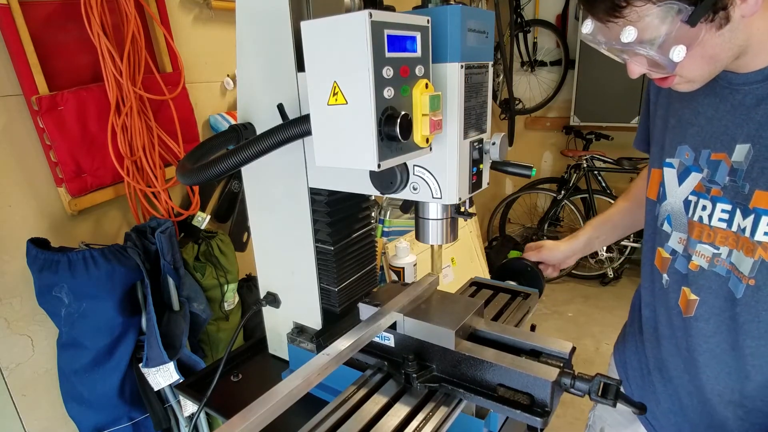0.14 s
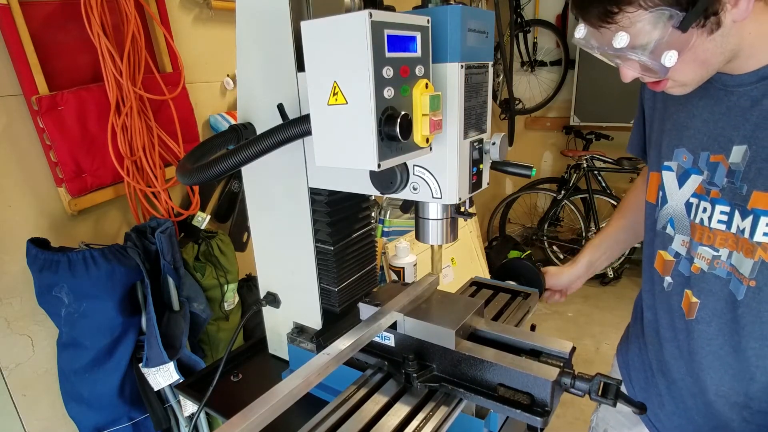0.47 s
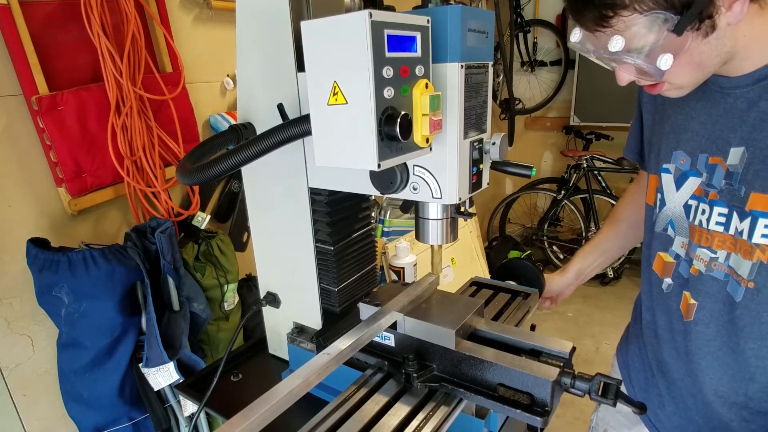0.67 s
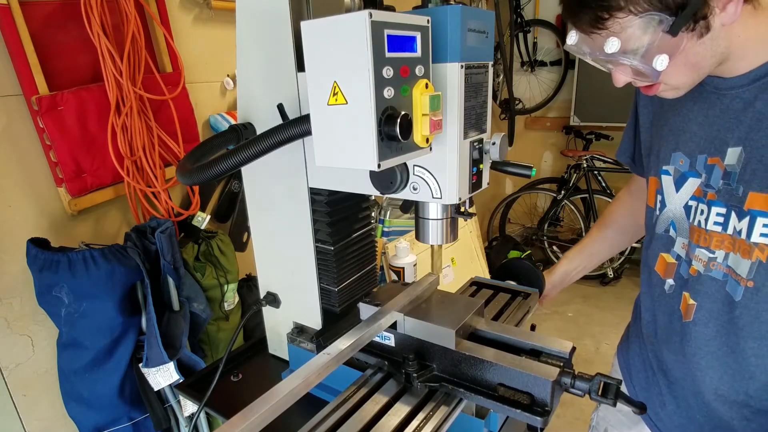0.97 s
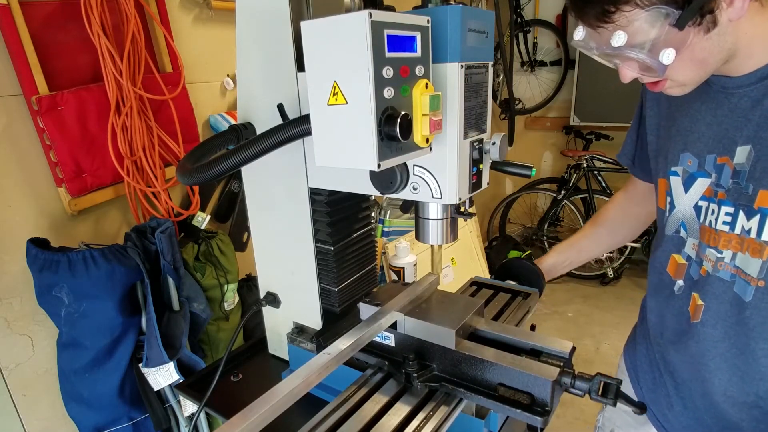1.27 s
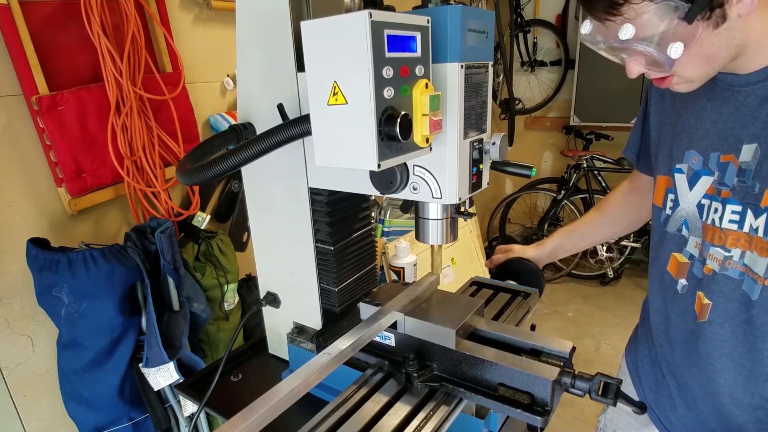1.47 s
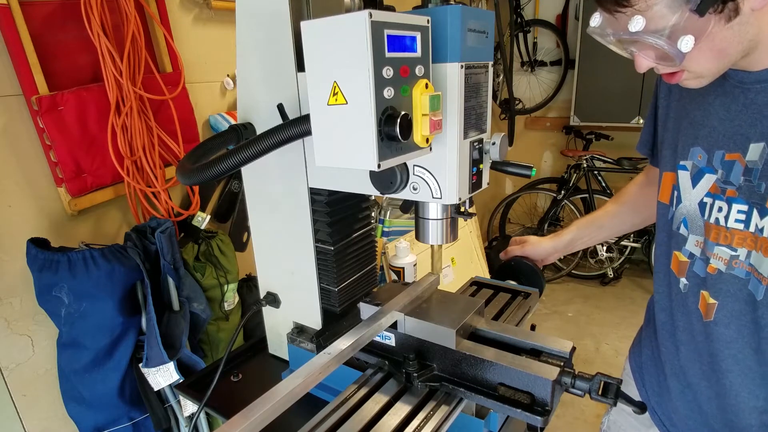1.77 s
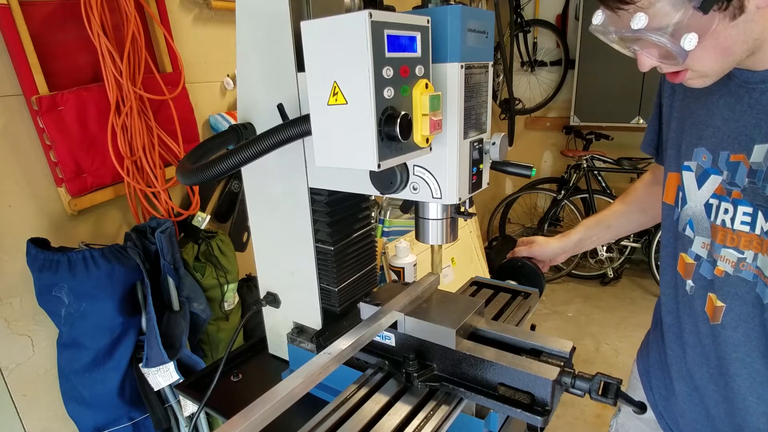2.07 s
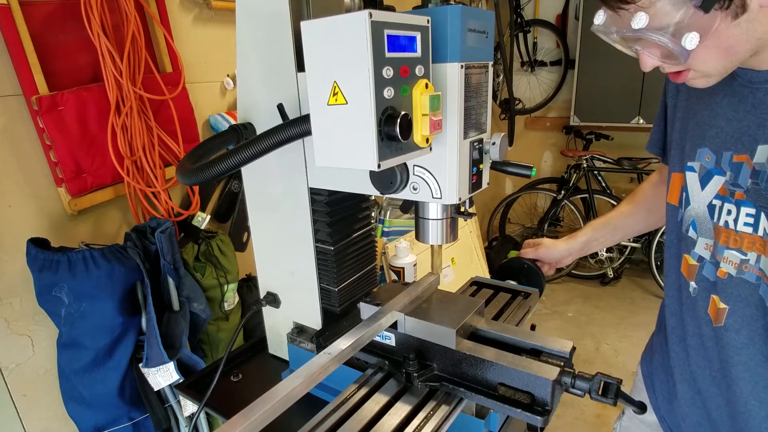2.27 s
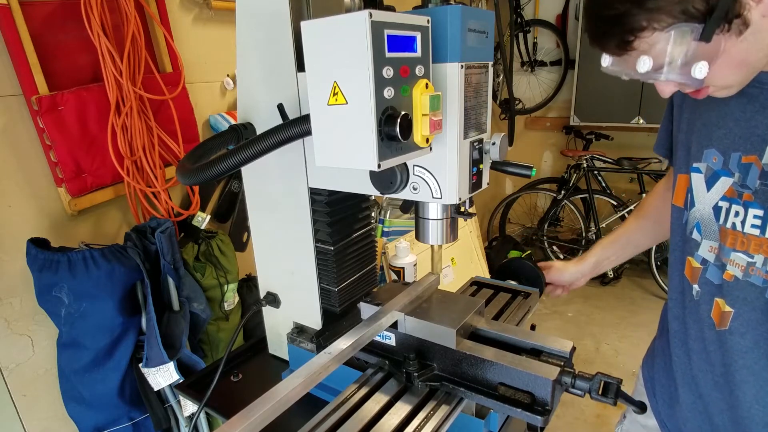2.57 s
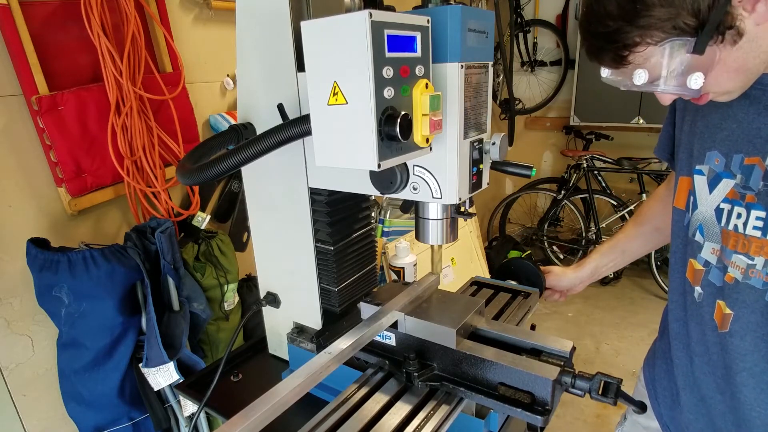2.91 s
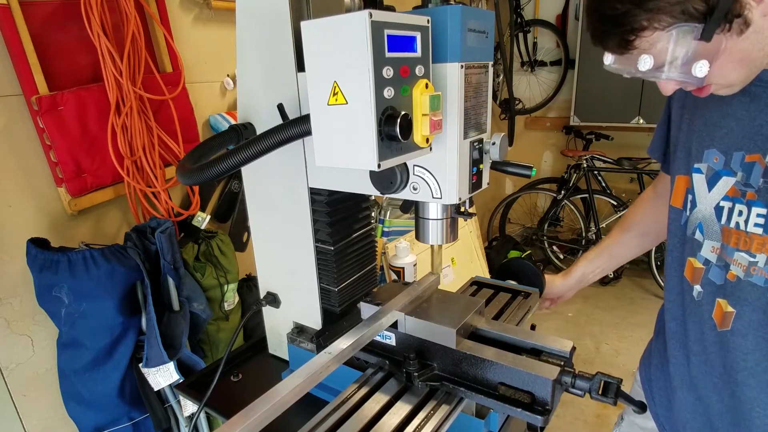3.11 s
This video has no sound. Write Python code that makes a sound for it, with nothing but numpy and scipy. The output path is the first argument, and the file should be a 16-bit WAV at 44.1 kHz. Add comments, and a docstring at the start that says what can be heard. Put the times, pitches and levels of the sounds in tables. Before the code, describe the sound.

A milling machine whines and rattles steadily while its cutter hisses lightly through a metal bar.

```python
"""Bench mill cutting aluminium

A bench mill runs in a small garage: its motor pinion whines against the spindle gear, teeth rattle and bearings sing.
An end mill bites lightly into a bar: flutes thump the table at multiples of spindle speed and scrape off chips
with a high, ringing hiss of coloured noise and fuzzy tones. The speed wavers a little as the hand feed varies;
gears, bearings and cutter follow it. The motor drive adds a thin whistle of fixed pitch."""
import sys
import numpy as np
from scipy.fft import rfft, irfft, next_fast_len
from scipy.io import wavfile
from scipy.ndimage import map_coordinates

SR = 44100
rng = np.random.default_rng(int(sys.argv[2]) if len(sys.argv) > 2 else 0)


def unload_wav(signal):
    """Save mono or channel-first audio to the path in sys.argv[1] as 16-bit WAV at rate SR, clipped to [-1, 1]."""
    wavfile.write(
        sys.argv[1],
        SR,
        np.round(np.clip(np.atleast_2d(signal).T, -1, 1) * 32767).astype(np.int16),
    )


N = 143325
TIME_S = np.arange(N) / SR


def amp(db):
    """Decibels to gain."""
    return 10 ** (np.asarray(db) / 20)


def unit(x):
    """Scale to rms 1."""
    return x / np.sqrt(np.mean(x ** 2) + 1e-20)


def along(points, hz):
    """Interpolate (Hz, value) points on a log frequency axis."""
    point_hz, value = np.transpose(points)
    return np.interp(np.log(hz + 1), np.log(point_hz + 1), value)


def curve(rows, column=1):
    """One column of (seconds, value, ..) rows, interpolated to every sample."""
    columns = np.transpose(rows)
    return np.interp(TIME_S, columns[0], columns[column])


def wobble(knots_per_s):
    """A smooth random curve through normal-distributed knots."""
    knots = rng.standard_normal(N // 20)
    return map_coordinates(knots, [np.arange(N) * knots_per_s / SR + 2], mode="wrap")


def cycle(turns):
    """A cosine, one period per turn."""
    return np.cos(2 * np.pi * turns)


def filtered(x, response):
    """Apply a gain that depends on frequency, zero-padded."""
    m = next_fast_len(N + SR // 2)
    return irfft(rfft(x, m) * response(np.fft.rfftfreq(m, 1 / SR)), m)[..., :N]


# Left-right likeness of diffuse sound. Each row: frequency in Hz, correlation from -1 to 1.
LIKENESS = [(60, 0.69), (270, 0.97), (450, 0.82), (740, 0.46), (1200, 0.14), (2000, 0.25), (3300, 0.098),
            (5500, -0.25), (15000, -0.082)]
RIPPLE_DB, RIPPLE_STEP_HZ = 1, 29.88  # fine colour from the garage's reflections


def diffuse(pair, spectrum, pan_db=0):
    """Colour two white noises and spread them in stereo as the garage walls do."""
    def response(hz):
        angle = np.arccos(np.clip(along(LIKENESS, hz), -1, 1)) / 2
        ripple_db = RIPPLE_DB * map_coordinates(rng.standard_normal(N // 20), [hz / RIPPLE_STEP_HZ])
        return amp(along(spectrum, hz) + ripple_db) * [np.cos(angle), np.sin(angle)]

    mid, side = filtered(pair, response)
    # sqrt(SR / 2) turns dB per Hz into signal level
    return np.sqrt(SR / 2) * np.array([mid + side, mid - side]) * amp([[pan_db], [-pan_db]])


def repeating(turns, steps):
    """A random pattern that comes round with every turn."""
    pattern = rng.standard_normal(steps)
    return unit(map_coordinates(pattern, [turns % 1 * steps], mode="grid-wrap"))


def gear_noise(turns, repeat_db, steps):
    """Two noises, partly fresh and partly the same on every turn."""
    worn = np.array([repeating(turns, steps), repeating(turns, steps)])
    return unit(rng.standard_normal((2, N)) + amp(repeat_db) * worn)


def tones(rows, clock_s, waver_db):
    """Fuzzy tones with wandering phase; each channel has its own flutter."""
    out = np.zeros((2, N))
    for hz, width_hz, *levels_db in rows:
        drift = np.cumsum(rng.standard_normal(N)) * np.sqrt(np.pi * abs(width_hz) / SR)
        phase = 2 * np.pi * hz * clock_s + drift
        for side, db in enumerate(levels_db):
            flutter = amp(waver_db * wobble(2 * width_hz))
            out[side] += amp(db) * unit(flutter * np.sin(phase + 0.53 * wobble(width_hz)))
    return out


PINION_TEETH, GEAR_TEETH = 18, 45
# Gear mesh tone. Each row: start in seconds, level in dB before the channel offsets.
MESH = [(0, -28.5), (.05, -26), (.15, -29.5), (.24, -25), (.33, -24.5), (.45, -38), (.53, -28.5),
        (.62, -34), (.69, -31.5), (.76, -24.5), (.83, -26), (.92, -30.5), (1.02, -26.5), (1.11, -36),
        (1.21, -29.5), (1.31, -25), (1.46, -34.5), (1.56, -29.5), (1.66, -32), (1.8, -31), (1.95, -30),
        (2.06, -28), (2.2, -26.5), (2.3, -32.5), (2.5, -25), (2.63, -41), (2.74, -34), (2.84, -27.5),
        (3.0, -29), (3.13, -31.5), (3.25, -23.5)]
# Mesh sidebands. Each row: offset in motor turn rates, left and right level in dB before waver.
SIDEBANDS = [(-1, -50, -42), (1, -44, -31)]
MESH_LEFT_DB, MESH_RIGHT_DB = -6.5, 7
MESH_LEFT_WAVER_DB, MESH_RIGHT_WAVER_DB = 4, 1.06


def gear_whine(motor):
    """Tooth meshing tone, of opposite sign left and right; the off-centre pinion adds sidebands."""
    phase = 2 * np.pi * motor
    mesh_db = curve(MESH)
    half_swing_db = (mesh_db + mesh_db.mean()) / 2
    left_gain = amp(MESH_LEFT_DB + half_swing_db + MESH_LEFT_WAVER_DB * wobble(16))
    left = -left_gain * np.sin(PINION_TEETH * phase + 0.4 * wobble(12))
    right_gain = amp(MESH_RIGHT_DB + mesh_db + MESH_RIGHT_WAVER_DB * wobble(30.32))
    right = right_gain * np.sin(PINION_TEETH * phase)
    out = np.sqrt(2) * np.array([left, right])
    for step, *levels_db in SIDEBANDS:
        order = PINION_TEETH + round(step)
        for side, db in enumerate(levels_db):
            out[side] += amp(db + wobble(15)) * unit(np.sin(order * phase + 0.9 * wobble(12)))
    return out


# Gearbox rumble. Each row: frequency in Hz, density in dB per Hz.
RUMBLE = [(20, -95), (40, -85), (60, -73), (130, -72), (220, -69.5), (350, -69), (480, -69), (560, -70.5),
          (680, -70.5), (750, -75), (830, -71.5), (940, -87), (1200, -96), (2000, -120)]
RUMBLE_REPEAT_DB = -6  # repeating part over fresh part


def gear_rumble(spindle):
    """Low noise of uneven teeth, partly repeating every spindle turn."""
    return diffuse(gear_noise(spindle, RUMBLE_REPEAT_DB, steps=1790), RUMBLE)


# Tooth rattle through the head casting. Each row: frequency in Hz, density in dB per Hz before panning.
RATTLE = [(600, -110), (900, -69), (1000, -61), (1130, -58), (1310, -60), (1380, -65.5), (1530, -71.5),
          (1620, -59), (1780, -70), (2000, -65), (2140, -71.5), (2280, -62), (2480, -75), (2620, -67.5),
          (2820, -78.5), (3300, -73), (3470, -78), (3600, -66), (3700, -78.5), (4080, -77.5), (4500, -79.5),
          (5300, -83), (6300, -85), (8000, -83), (9400, -91), (12500, -94), (13200, -82.5), (13900, -89),
          (15500, -96)]
RATTLE_REPEAT_DB, RATTLE_PAN_DB = -4, -0.4  # repeating part over fresh part; left gain, right opposite
RATTLE_SWING_DB, TOOTH_SWING_DB, RATTLE_DRIFT_DB = 1, 1.36, 0.45


def tooth_rattle(motor, spindle):
    """Noise swelling once per motor turn; the gear pair realigns every second spindle turn."""
    realign = spindle / 2
    swing_db = RATTLE_SWING_DB * cycle(motor)
    swing_db += TOOTH_SWING_DB * repeating(realign, steps=90)
    swing_db += RATTLE_DRIFT_DB * wobble(25.18)
    rattle = unit(amp(swing_db) * gear_noise(realign, RATTLE_REPEAT_DB, steps=3580))
    return diffuse(rattle, RATTLE, RATTLE_PAN_DB)


# Low gear chatter. Each row: start in seconds, rms level in dB.
CHATTER = [(0, -41.5), (.13, -40.5), (.19, -48), (1.0, -51.5), (2.2, -46), (2.5, -45), (2.63, -43.5),
           (2.75, -49), (3.25, -46)]
# Chatter colour. Each row: frequency in Hz, relative density in dB.
CHATTER_BAND = [(150, -13), (260, -21), (310, -0.5), (370, 1.5), (430, -24), (700, -59)]


def gear_chatter():
    """Unloaded gears knock about in their play: low band noise with a set level curve."""
    return amp(curve(CHATTER)) * unit(diffuse(rng.standard_normal((2, N)), CHATTER_BAND))


# Lesser gear and housing tones. Each row: Hz at mean speed, nominal width in Hz, left and right rms in dB.
HOUSING_TONES = [(548.7, 12, -54.5, -47.5), (630, 3.95, -77, -57), (815.6, 8, -53, -50.5),
                 (869, 8.1, -59, -51.5), (919, 4.47, -53, -56), (1033, 5.2, -41, -44),
                 (1266, 7.2, -50, -41.5), (1308, 9.1, -48.5, -54), (1453, 5.22, -46.5, -52)]


def housing_tones(clock_s):
    """Gear and housing tones that follow the motor speed."""
    return tones(HOUSING_TONES, clock_s, waver_db=3)


# Bearing tones. Each row: Hz at mean speed, nominal width in Hz, left and right level in dB before throb.
BEARINGS = [(1649, 4, -41, -38.5), (1710, 4, -42.5, -52), (1943, 8, -49, -47), (2020, 10, -53, -51),
            (2083, 5, -55, -54), (2272, 5, -53, -51), (2314, 8, -45.5, -46.5), (2652, 14, -51.5, -52.5),
            (2952, 10, -56, -50.5), (3300, 40, -55.5, -53.5), (3622, 12, -48, -46), (3790, 12, -51.5, -59),
            (3951, 4, -64, -58), (4268, 25, -57, -56), (4570, 12, -62, -62), (4890, 12, -65, -62),
            (5230, 20, -65, -59)]
CAGE_TURNS_PER_MOTOR_TURN = 0.219
CAGE_SWING_DB, SPINDLE_SWING_DB, BEARING_WAVER_DB = 2.5, 1.5, 3.2


def bearings(clock_s, motor, spindle):
    """Bearing tones throb as the ball cage and the spindle go round."""
    cage_phase = 2 * np.pi * CAGE_TURNS_PER_MOTOR_TURN * motor + 1.4 * wobble(2.76)
    throb_db = CAGE_SWING_DB * np.cos(cage_phase) + SPINDLE_SWING_DB * cycle(spindle)
    return unit(amp(throb_db)) * tones(BEARINGS, clock_s, BEARING_WAVER_DB)


# Cutting force. Each row: start in seconds, gain in dB of orders up to 3, gain in dB of higher orders.
FORCE = [(0, -24, -16), (.12, -31, -9), (.22, -0.5, 1), (.4, -3.5, -1.5), (.52, 1.5, -5), (.66, -3.5, -6),
         (.93, 0.5, -1.5), (1.3, 0.5, 1), (1.55, -1, 2.5), (1.9, -2.5, 0.5), (2.25, -3, -3.5),
         (2.42, 0, -2), (2.68, -3, -2.5), (2.8, -9, -8), (2.92, 0, -4), (3.25, 0.5, -5.5)]
# Cutter thump. Each row: multiple of spindle speed, rms level in dB before force and waver.
THUMP = [(2, -61), (3, -44.5), (4, -55), (5, -47), (7, -58), (8, -54), (9, -56.5), (11, -56), (12, -53.5),
         (13, -56), (21, -54.5)]


def thump(spindle):
    """The flutes push the bar and table at multiples of the spindle speed."""
    low_db, high_db = curve(FORCE), curve(FORCE, column=2)
    out = np.zeros(N)
    for order, db in THUMP:
        force_db = low_db if round(order) <= 3 else high_db + 2 * wobble(8)
        tone = unit(np.sin(2 * np.pi * (round(order) * spindle + rng.random())))
        out += amp(db + force_db + 0.54 * wobble(7.18)) * tone
    return out


# Chip hiss. Each row: start in seconds, level in dB.
CHIPS = [(0, -56), (.115, -63.5), (.135, -41.5), (.17, -39), (.27, -43), (.36, -47), (.49, -41),
         (.56, -43.5), (.68, -45.5), (.74, -41.5), (.88, -44.5), (1.02, -40), (1.08, -45.5), (1.28, -40),
         (1.38, -43), (1.6, -43), (1.87, -45), (2.03, -43.5), (2.2, -49.5), (2.3, -45), (2.43, -40.5),
         (2.58, -51.5), (2.8, -49.5), (2.87, -42.5), (3.03, -45), (3.2, -42), (3.25, -45)]
# Chip scrape. Each row: frequency in Hz, dB per Hz relative to chip level, before panning.
SCRAPE = [(3000, -87), (5200, -46), (6900, -43.5), (7400, -31), (7750, -27), (8200, -35.5), (8750, -37.5),
          (9400, -57), (10200, -41), (10600, -58), (11150, -39.5), (11800, -53), (12750, -44), (13230, -33),
          (13800, -45), (14400, -42), (15000, -60), (15800, -57)]
# Cutter ringing. Each row: Hz, nominal width in Hz, left and right dB relative to chip level, before bite.
CUTTER = [(7390, 25, -21, -14), (7660, 20, -2, -14), (7770, 16, -12, -15), (8570, 12, -19, -18),
          (10175, 25, -25, -24), (11127, 25, -21, -19), (13200, 45, -11, -8)]
CHIP_TURN_DB, CHIP_FLUTE_DB, CHIP_GRAIN_DB = 1.96, 0.76, 0.5
CHIP_PAN_DB = -0.7  # left gain, right opposite


def chips(spindle):
    """Grainy scraping that pulses with the turning cutter, plus cutter ringing under the same pulses."""
    bite_db = CHIP_TURN_DB * cycle(spindle)
    bite_db += CHIP_FLUTE_DB * repeating(spindle, steps=12)
    bite_db += CHIP_GRAIN_DB * wobble(880)
    bite = unit(amp(bite_db + wobble(29.88)))
    scrape = diffuse(bite * rng.standard_normal((2, N)), SCRAPE, CHIP_PAN_DB)
    ringing = bite * tones(CUTTER, TIME_S, waver_db=4.5)
    return amp(curve(CHIPS)) * (scrape + ringing)


# Drive whistle. Each row: Hz, nominal width in Hz, left and right dB relative to DRIVE_LEVEL_DB.
DRIVE = [(15407, 4, -7, -6), (15655, 4, 0, 1)]
DRIVE_LEVEL_DB = -66


def drive_whistle():
    """Thin motor drive tones, independent of motor speed."""
    return amp(DRIVE_LEVEL_DB) * tones(DRIVE, TIME_S, waver_db=7.0)


# Motor speed. Each row: start in seconds, motor turns per second.
SPEED = [(0.0, 61.5), (0.12, 61.7), (0.26, 61.1), (0.45, 62.0), (0.8, 61.4), (1.18, 61.9), (1.3, 61.4),
         (1.46, 62.0), (1.65, 61.6), (1.76, 61.8), (2.2, 61.5), (2.27, 61.9), (2.52, 61.4), (2.62, 62.1),
         (2.92, 61.3), (3.05, 61.7), (3.22, 61.5), (3.25, 61.0)]


def scene():
    """One motor speed drives gears, bearings and cutter."""
    speed = curve(SPEED)
    motor = np.cumsum(speed) / SR  # turns
    spindle = motor * PINION_TEETH / GEAR_TEETH  # turns
    clock_s = motor / speed.mean()  # time that runs with the motor
    gears = gear_whine(motor) + gear_rumble(spindle) + tooth_rattle(motor, spindle) + gear_chatter()
    head = gears + housing_tones(clock_s) + bearings(clock_s, motor, spindle)
    return head + thump(spindle) + chips(spindle) + drive_whistle()


TOP_HZ = 15780


def record(dry):
    """Band limit: nothing passes from TOP_HZ up."""
    return filtered(dry, lambda hz: hz < TOP_HZ)


dry = scene()
out = record(dry)
unload_wav(out)
```